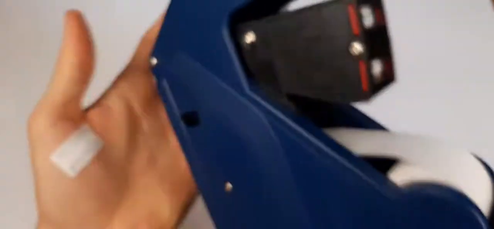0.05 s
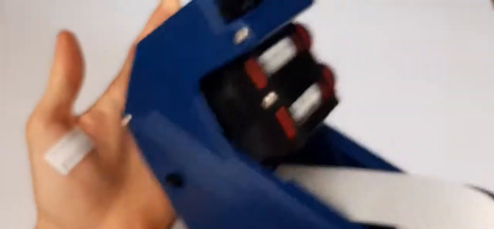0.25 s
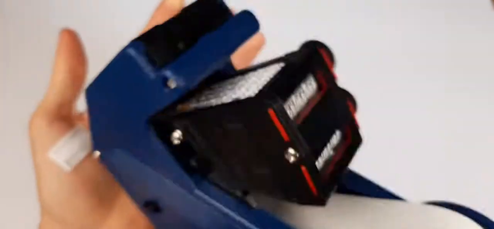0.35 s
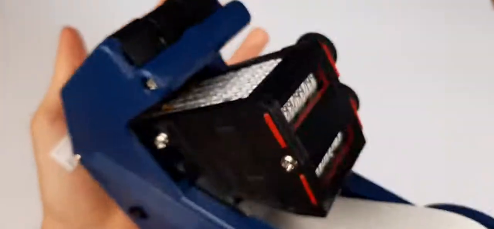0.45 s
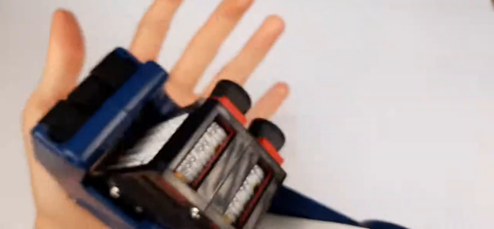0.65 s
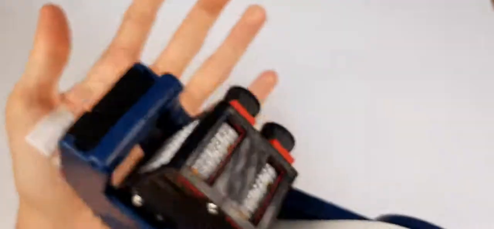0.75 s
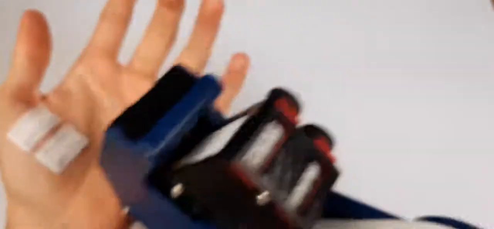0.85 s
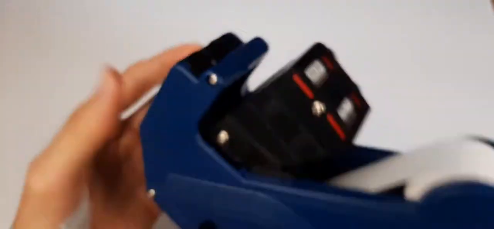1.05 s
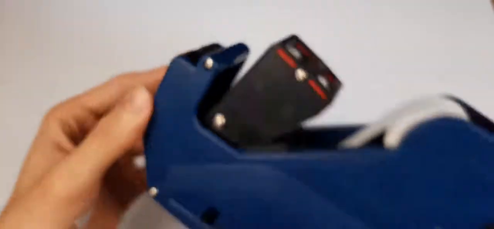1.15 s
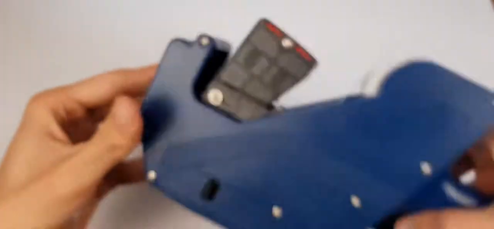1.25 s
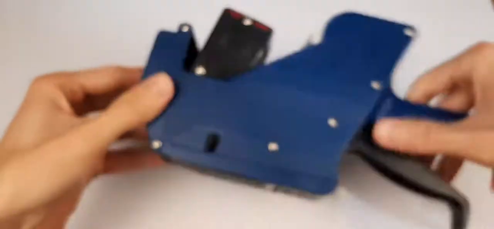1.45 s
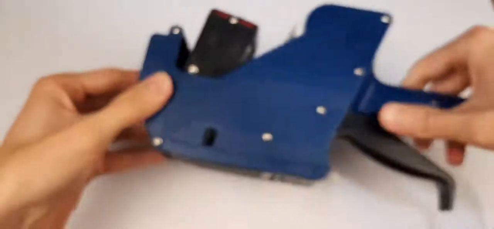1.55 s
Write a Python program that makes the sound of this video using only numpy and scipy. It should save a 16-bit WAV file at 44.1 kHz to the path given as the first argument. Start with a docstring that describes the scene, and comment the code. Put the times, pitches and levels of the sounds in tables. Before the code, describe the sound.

Sharp plastic clacks from one squeeze of a labelling tool, then faint ticks and rubs.

```python
"""A hand labeller in a live room

A plastic labeller is squeezed once, close by: its mechanism clacks shut, scrapes back and snaps home.
Each impact radiates a broadband crack, a low thud and the damped modes of the case. The return spring
rings after the first tap; lighter ticks and rubs follow the squeeze as the tool is lifted and turned.
The small room reverberates, and under it all lie quiet room noise and a faint, wavering whine."""
import sys
import numpy as np
from scipy import signal
from scipy.fft import rfft, irfft, next_fast_len
from scipy.io import wavfile
from scipy.ndimage import map_coordinates

SR = 44100
rng = np.random.default_rng(int(sys.argv[2]) if len(sys.argv) > 2 else 0)


def inscribe(sig):
    """Save sig as 16-bit PCM at rate SR to the path in sys.argv[1].

    A 1-D sig is mono; a 2-D sig holds one channel per row.
    Samples are clipped to [-1, 1] before scaling.
    """
    pcm = np.round(np.clip(np.atleast_2d(sig).T, -1, 1) * 32767)
    wavfile.write(sys.argv[1], SR, pcm.astype(np.int16))


N = 70560

# room noise spectrum (frequency [Hz], relative level [dB])
FLOOR_SPECTRUM = [(20, -23), (55, -14.5), (85, 12), (115, 0), (200, -11.5), (275, -0.5), (400, -15.5),
                  (900, -7), (2000, -16.5), (5000, -25.5), (16000, -28.5)]
# reverberation time of the room (frequency [Hz], t60 [s])
ROOM_T60 = [(80, .45), (300, 0.48), (1200, 0.33), (4000, 0.33), (8000, 0.28), (15000, 0.18)]
# envelopes of the whine's two tones (time [s], lower tone [dB], upper tone [dB])
WHINE_LEVELS = [(0.451, -80, -90), (.62, -73, -79), (.82, -62, -65.5), (.98, -68, -64.5),
                (1.13, -86, -65.5), (1.24, -80.5, -65.5), (1.6, -75.5, -68)]
# fingers sliding on the case (time [s], length [s], level [dB])
FINGER_RUBS = [(.82, 0.031, -53), (1.26, 0.077, -70), (1.34, 0.052, -77.5), (1.398, 0.031, -62.5)]
# finger friction spectrum (frequency [Hz], relative level [dB])
RUB_SPECTRUM = [(200, -57), (800, -1.5), (1250, 3.5), (2000, -2.5), (2800, -12), (3600, -9), (7800, -17),
                (9000, -26), (16000, -23)]
# resonance band of the return spring (frequency [Hz], relative level [dB])
SPRING_SPECTRUM = [(2500, -40), (3000, -3), (3200, 0), (3400, -4), (3900, -40)]
# the slide taking up its play, then scraping back (time [s], length [s], level [dB])
SLIDE_SCRAPES = [(.178, 0.015, -55.5), (.338, .022, -41.5), (.367, 0.067, -36)]
# slide friction spectrum (frequency [Hz], relative level [dB])
SCRAPE_SPECTRUM = [(150, -17), (700, -11), (1000, -4), (1800, 8.5), (2700, 2.5), (5500, -8.5),
                   (15000, -23.5)]
# modes of the plastic case (frequency [Hz], relative level [dB], t60 [multiple of the crack's])
CASE_MODES = [(1090.6, -4, 1.6), (1245.5, -2.5, 1.3), (1342, 2, 0.61), (1576, -3, 0.67), (1864, 0.5, 0.75),
              (2344, 0.5, 0.38), (3123, -3.5, 1.3), (3763, -10, 2.7), (4726, -7, .9), (6250, -9, 3),
              (7485, 11, 1.3)]
# spectrum of an impact's crack (frequency [Hz], relative level [dB])
CRACK_SPECTRUM = [(200, -29), (700, -15.5), (1200, 2), (2000, 4), (3200, 4), (4300, 5.5), (6000, 3.5),
                  (7900, -1), (8600, -9), (10500, -9.5), (12500, -7.5), (15500, -11)]
# spectrum of an impact's thud (frequency [Hz], relative level [dB])
THUD_SPECTRUM = [(30, -22), (80, -5), (160, -4.5), (350, -2.5), (570, 1.5), (790, 6.5), (1000, -8),
                 (2000, -31), (6000, -60.5)]
# clacks heard during the squeeze; at .3828 s, a faint, short tick just before the closing snap
# (time [s], level [dB], thud [dB re crack], ring [dB re crack], ring centre [Hz],
# treble shelf [dB], shelf edge [Hz], t60 [s])
SQUEEZE_CLACKS = [(.1815, -24.5, -18, 2.5, 1670, -2, 5000, 0.042),
                  (.1853, -31, -21.5, 1.5, 1960, 2.5, 7000, 0.014),
                  (.1955, -24, -22, -4, 1990, -26.5, 5630, 0.36),
                  (.2025, -21, -21.5, -2.5, 1630, 3.5, 7000, 0.068),
                  (.2052, -9, -23, -4, 3600, 5, 8000, 0.032),
                  (.2105, -19, -21.5, 6.5, 1630, -1, 7007, 0.03),
                  (.2165, -22.5, -20.5, -5, 1350, 5, 7000, .05),
                  (.2188, -10, -12.5, -0.5, 2304, 6, 8000, 0.03),
                  (.2213, -19.5, -3, 4.5, 1060, -3.5, 7000, .022),
                  (.226, -30.5, -16.5, 1.5, 1500, -1.5, 6935, 0.0098),
                  (.2281, -24, -10.5, 14, 950, -12, 7060, .02),
                  (.3152, -30.5, -4, -4.5, 1800, 15.5, 10000, 0.026),
                  (.3278, -30.5, -3.5, 4.5, 1554, 8.5, 6890, 0.055),
                  (.333, -29.5, -11.5, -4, 2350, 4, 9000, 0.052),
                  (.348, -28, -23.5, 0, 1850, 17.5, 9340, .035), (.3563, -21, -12, -4, 1830, 0, 6970, .04),
                  (.3828, -27, -13.5, -10.5, 3052, -3, 6100, 0.021),
                  (.3918, -27.5, -20, 3, 3098, 10, 7010, 0.049),
                  (.3959, -3.5, -22.5, -13, 1420, 10, 9200, 0.013),
                  (.4003, -25, -19, 12, 1930, -5.5, 7000, .017)]
# handling ticks on the case, columns as in SQUEEZE_CLACKS
HANDLING_TICKS = [(.0075, -59.5, -2.5, 21, 1320, 8, 6740, 0.081),
                  (.0143, -44, -17.5, 14, 1220, 8.5, 8440, 0.023),
                  (.656, -35.5, -24, -7, 1070, -7.5, 5300, 0.084),
                  (.673, -38.5, -9, 0.5, 1070, -28, 5080, 0.046),
                  (.691, -45, -16, -12.5, 1350, -11, 5340, 0.27),
                  (.7108, -29.5, -15.5, -7.5, 1520, 9.5, 8600, 0.022),
                  (.787, -49, -24, -15, 1250, -3, 8540, 0.078),
                  (.8235, -47, -18, -5.5, 1400, -18, 6500, 0.15),
                  (.8455, -45.5, -14.5, 0, 1900, -3, 7300, .034),
                  (.927, -63.5, -17, 4.5, 1230, -12, 5015, 0.086),
                  (1.0625, -73, -2, 10, 1448, 1, 5990, 0.014), (1.129, -67, -25, -2, 1538, 12, 6900, .012),
                  (1.2325, -54, -20, -2.5, 1300, -20, 4500, 0.054),
                  (1.47, -76.5, -4, 11, 1150, 7, 6950, 0.03)]

FLOOR_ALIKE, CRACK_ALIKE, THUD_ALIKE = .36, .2, .58  # left-right correlation
SQUEEZE_ROOM_DB, HANDLING_ROOM_DB, WHINE_ROOM_DB = -11, -12, -3  # reverberation re direct sound
EARLY_DB, EARLY_T60, ROOM_MONO_HZ = -14.5, .023, 1400
FLOOR_DB, LOW_CUT_HZ, TOP_HZ = -73, 110, 15850
WHINE_HZ = (947, 1021)
WAVER_HZ, FLUTTER_DB = 20, 4.2  # scale of the whine's random pitch and level changes
SPRING_START_S, PING_DB, PING_T60, SPRING_TAIL_DB, SPRING_TAIL_T60 = .0145, -42.5, .025, -58, .26
RING_FOCUS_DB = 19  # loss per octave for modes away from the ring centre
GRIP_DETUNE = .015  # the grip shifts each mode by about this fraction from contact to contact
RING_SPREAD_RAD = .15  # scale of the modes' phase scatter, which grows with pitch
RING_LOW_HZ = 970  # the case radiates little below this
RING_ROOM_DB = -3  # the ring carries into the room less than the crack
CLACK_ATTACK_S, TICK_ATTACK_S, THUD_ATTACK_S = .00058, .00027, .0015
CLACK_PAN_DB, TICK_PAN_DB, PAN_TOP_HZ, LEFT_LEAD_S = 3, 6, 9600, .00009


def amp(db):
    """Amplitude ratio of a level in decibels."""
    return 10 ** (np.asarray(db) / 20)


def unit(x):
    """Normalisation to rms 1."""
    return x / np.sqrt(np.mean(x ** 2) + 1e-20)


def along(points, hz):
    """Interpolation of (frequency, value) points on a logarithmic frequency axis."""
    frequencies, values = np.transpose(points)
    return np.interp(np.log(hz + 1), np.log(frequencies + 1), values)


def fade(t, t60):
    """Exponential damping: 60 dB in t60 seconds."""
    return np.exp(-np.log(1000) * t / t60)


def treble_share(hz, edge_hz, order):
    """High-pass transition from 0 to 1, one half at the edge."""
    return 1 - 1 / (1 + (hz / edge_hz) ** order)


def filtered(x, response):
    """Linear filtering: the spectrum of x times a frequency response."""
    size = x.shape[-1]
    padded = next_fast_len(size + 4096)
    return irfft(rfft(x, padded) * response(np.fft.rfftfreq(padded, 1 / SR)), padded)[..., :size]


def noise(spectrum, alike, size):
    """Partial coherence: two coloured noises mix to a stereo pair of rms 1 and correlation `alike`."""
    mid, side = filtered(rng.standard_normal((2, size)), lambda hz: amp(along(spectrum, hz)))
    angle = np.arccos(np.clip(alike, -1, 1)) / 2
    mid, side = np.cos(angle) * mid, np.sin(angle) * side
    return unit(np.array([mid + side, mid - side]))


def add(track, start_s, sound):
    """Superposition of a sound on the track."""
    part = track[:, max(round(start_s * SR), 0):][:, :sound.shape[1]]
    part += sound[:, :part.shape[1]]


def room_noise():
    """Stationary random noise, strongest in the bass."""
    return amp(FLOOR_DB) * noise(FLOOR_SPECTRUM, FLOOR_ALIKE, N)


def diffuse(size):
    """Diffuse field: white noise, alike at both ears at long wavelengths and unrelated at short ones."""
    mid, side = rng.standard_normal((2, size))
    mid = filtered(mid, lambda hz: np.sqrt(2 - treble_share(hz, ROOM_MONO_HZ, 4)))
    side = filtered(side, lambda hz: np.sqrt(treble_share(hz, ROOM_MONO_HZ, 4)))
    return np.array([mid + side, mid - side])


def room():
    """Reverberation: a random impulse response of energy 1 whose treble dies first."""
    hz, t, bands = signal.stft(diffuse(SR * 2 // 5), SR, nperseg=256)
    build_up = 1 - np.exp(-t / .0067)
    tail = signal.istft(bands * fade(t, along(ROOM_T60, hz)[:, None]) * build_up, SR, nperseg=256)[1]
    return tail / np.linalg.norm(tail[0])


def table_top():
    """Early reflections from the table and hands: an impulse response of energy 1."""
    t = np.arange(SR // 10) / SR
    early = diffuse(len(t)) * fade(t, EARLY_T60) * (1 - np.exp(-t / .0013))
    return early / np.linalg.norm(early[0])


def whine():
    """Beating of two close, randomly modulated tones; the lower gives way to the upper."""
    out, t = np.zeros((2, N)), np.arange(N) / SR
    times, *envelopes = np.transpose(WHINE_LEVELS)
    wobble = lambda rate_hz: map_coordinates(rng.standard_normal(N // 100), [t * rate_hz])
    for hz, levels in zip(WHINE_HZ, envelopes):
        pitch = hz + WAVER_HZ * wobble(rate_hz=120)
        tone = np.sin(2 * np.pi * np.cumsum(pitch) / SR)[None]
        blurred = tone + amp(WHINE_ROOM_DB) * signal.fftconvolve(tone, room(), axes=1)[:, :N]
        flutter = amp(FLUTTER_DB * wobble(rate_hz=60))
        out += unit(blurred * flutter) * amp(np.interp(t, times, levels))
    return out * (t > times[0])


def friction(strokes, spectrum, room_db):
    """Sliding friction: noise that swells in a Gaussian pulse with each stroke, plus reverberation."""
    t = np.arange(N) / SR
    swells = sum(amp(db) * np.exp(-(2 * (t - peak_s) / length) ** 2) for peak_s, length, db in strokes)
    rub = noise(spectrum, CRACK_ALIKE, N) * swells
    return rub + amp(room_db) * signal.fftconvolve(rub, room(), axes=1)[:, :N]


def spring():
    """Resonance of the return spring: narrow-band noise decays as a quick ping and a faint tail."""
    out, t = np.zeros((2, N)), np.arange(N) / SR
    envelope = amp(PING_DB) * fade(t, PING_T60) + amp(SPRING_TAIL_DB) * fade(t, SPRING_TAIL_T60)
    add(out, SPRING_START_S, noise(SPRING_SPECTRUM, CRACK_ALIKE, N) * envelope)
    return out


def case_ring(t, rise, centre_hz, t60):
    """Modal vibration: the struck spot best excites the damped case modes near centre_hz."""
    hz, db, t60_ratio = np.transpose(CASE_MODES)[:, :, None]
    gain = amp(db - RING_FOCUS_DB * np.abs(np.log2(hz / centre_hz)) + rng.normal(0, 1, hz.shape))
    hz = hz * (1 + GRIP_DETUNE * rng.standard_normal(hz.shape))
    scatter = rng.normal(0, 2, hz.shape) + rng.normal(0, 1, (2, len(hz), 1))  # shared + per ear
    phase = scatter * RING_SPREAD_RAD * (hz / hz[0]) ** 2
    modes = gain * np.sin(2 * np.pi * hz * t + phase) * fade(t, t60_ratio * t60)
    ring = modes.sum(1) * np.sqrt(2) / np.linalg.norm(gain)
    return signal.sosfilt(signal.butter(4, RING_LOW_HZ, "high", fs=SR, output="sos"), ring * rise)


def clack(thud_db, ring_db, centre_hz, treble_db, edge_hz, t60, attack_s):
    """Damped transient: a bright crack, the ring of the plastic case and a low thud."""
    t = np.arange(SR // 10) / SR
    rise = 1 - np.exp(-t / attack_s)
    crack = noise(CRACK_SPECTRUM, CRACK_ALIKE, len(t))
    crack = filtered(crack, lambda hz: amp(treble_db * treble_share(hz, edge_hz, 8)))
    ring = case_ring(t, rise, centre_hz, t60)
    thud_envelope = fade(t, 1.1 * t60) * (1 - np.exp(-t / THUD_ATTACK_S))
    thud = noise(THUD_SPECTRUM, THUD_ALIKE, len(t)) * thud_envelope
    return crack * fade(t, t60) * rise + amp(ring_db) * ring + amp(thud_db) * thud


def knocks(rows, attack_s, pan_db, room_db):
    """Multipath propagation: each clack or tick arrives directly, off the table and through the room."""
    out, side = np.zeros((2, N)), np.array([[.5], [-.5]])
    # the direct sound reaches the left ear earlier and, below PAN_TOP_HZ, louder
    pan = lambda hz: amp(side * pan_db * (hz < PAN_TOP_HZ))
    lead = lambda hz: np.exp(2j * np.pi * hz * side * LEFT_LEAD_S)
    for start_s, db, thud_db, ring_db, *timbre in rows:
        # each direction radiates its own waveform
        ahead = amp(db) * clack(thud_db, ring_db, *timbre, attack_s)
        down = amp(db) * clack(thud_db, ring_db, *timbre, attack_s)
        around = amp(db) * clack(thud_db, ring_db + RING_ROOM_DB, *timbre, attack_s)
        add(out, start_s, filtered(ahead, lambda hz: pan(hz) * lead(hz)))
        add(out, start_s, amp(EARLY_DB) * signal.fftconvolve(down, table_top(), axes=1))
        add(out, start_s, amp(room_db) * signal.fftconvolve(around, room(), axes=1))
    return out


def scene():
    """Superposition of the labeller, the hands and the background."""
    clacks = knocks(SQUEEZE_CLACKS, CLACK_ATTACK_S, CLACK_PAN_DB, SQUEEZE_ROOM_DB)
    ticks = knocks(HANDLING_TICKS, TICK_ATTACK_S, TICK_PAN_DB, HANDLING_ROOM_DB)
    slide = friction(SLIDE_SCRAPES, SCRAPE_SPECTRUM, SQUEEZE_ROOM_DB)
    fingers = friction(FINGER_RUBS, RUB_SPECTRUM, HANDLING_ROOM_DB)
    return clacks + ticks + slide + spring() + fingers + whine() + room_noise()


def record(dry):
    """Band limiting: a high-pass thins the deep bass and a steep low-pass ends the treble."""
    thinned = signal.sosfilt(signal.butter(2, LOW_CUT_HZ, "high", fs=SR, output="sos"), dry)
    return filtered(thinned, lambda hz: 1 / (1 + (hz / TOP_HZ) ** 120))


dry = scene()
out = record(dry)
inscribe(out)
```